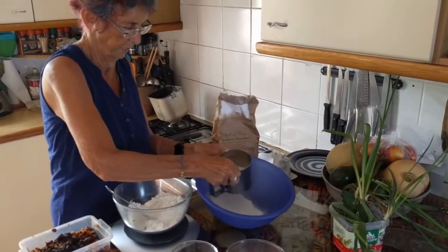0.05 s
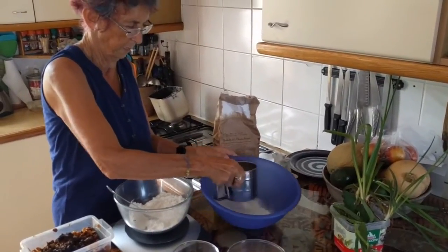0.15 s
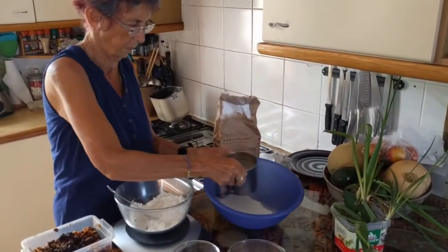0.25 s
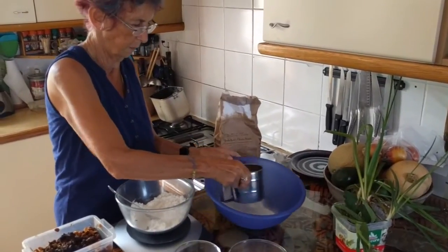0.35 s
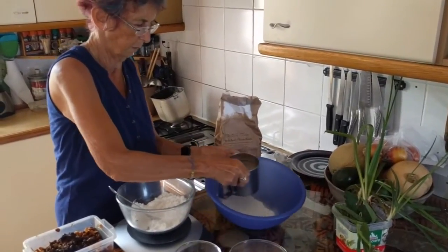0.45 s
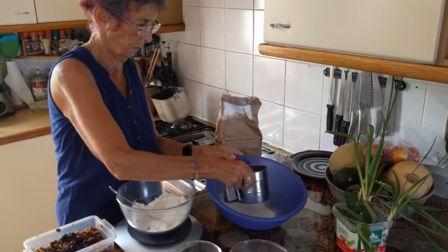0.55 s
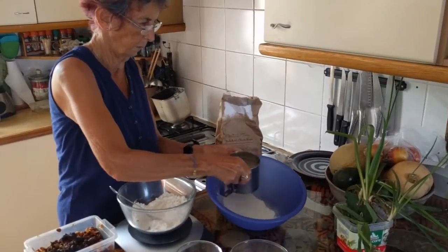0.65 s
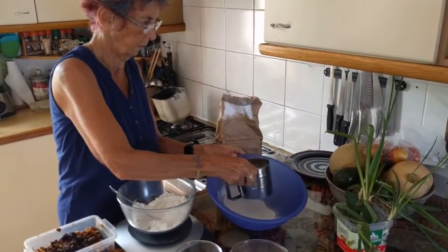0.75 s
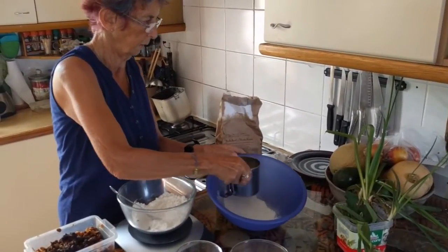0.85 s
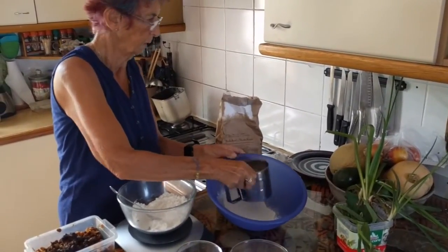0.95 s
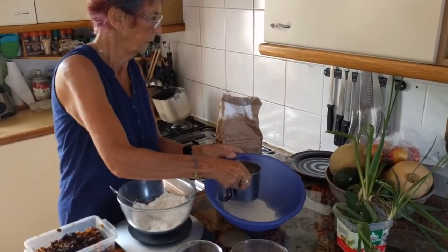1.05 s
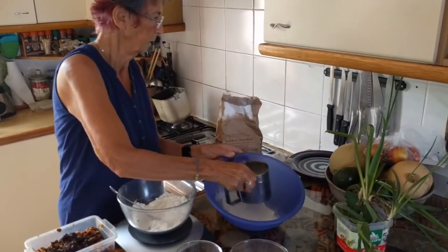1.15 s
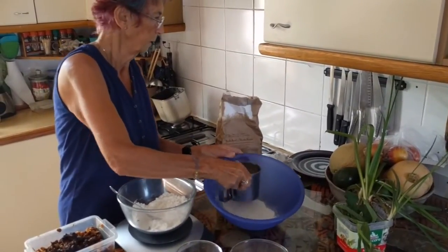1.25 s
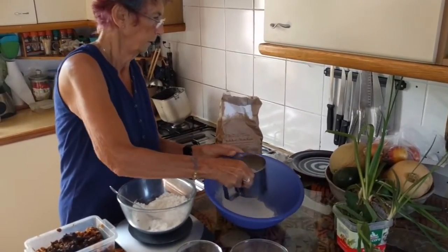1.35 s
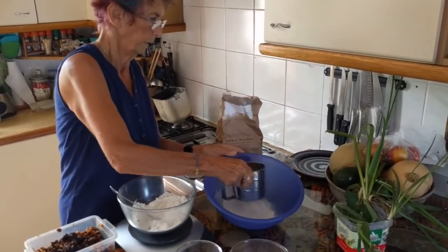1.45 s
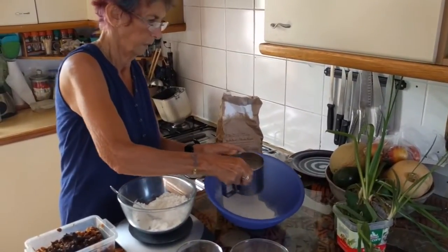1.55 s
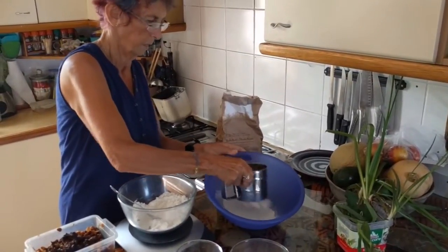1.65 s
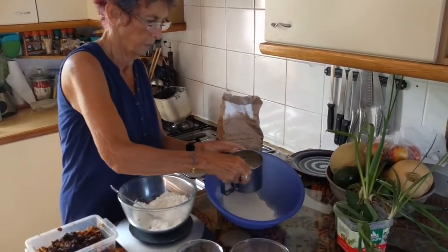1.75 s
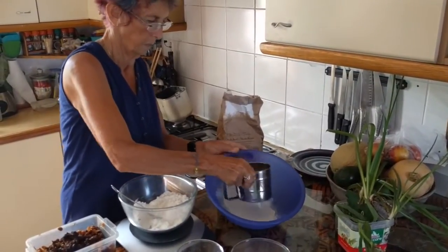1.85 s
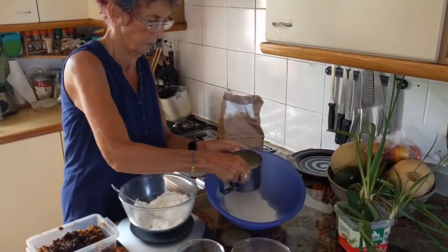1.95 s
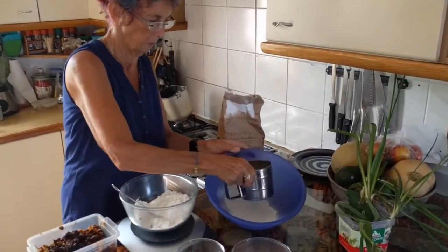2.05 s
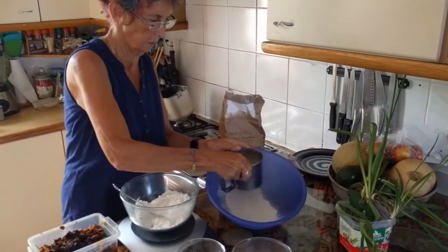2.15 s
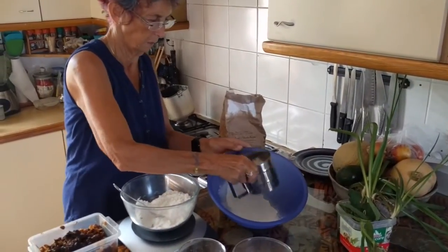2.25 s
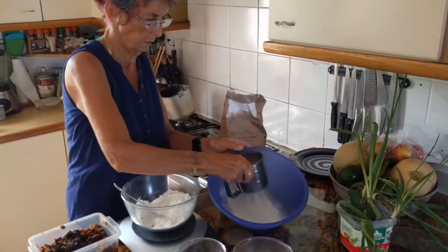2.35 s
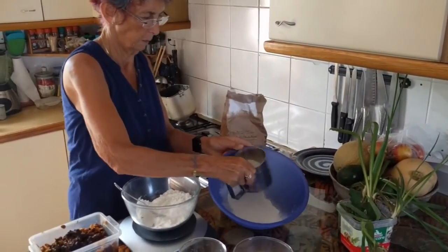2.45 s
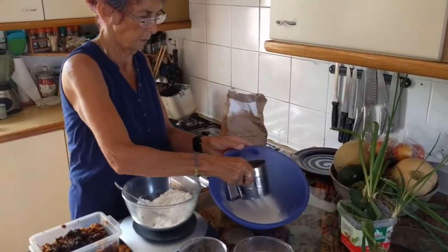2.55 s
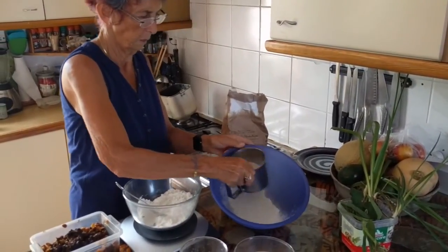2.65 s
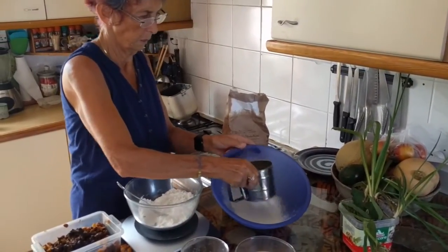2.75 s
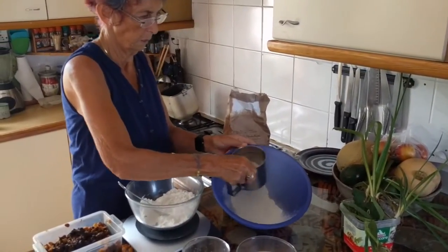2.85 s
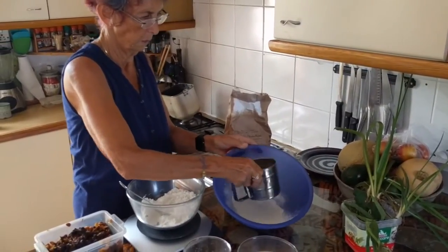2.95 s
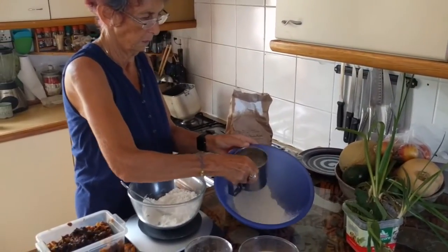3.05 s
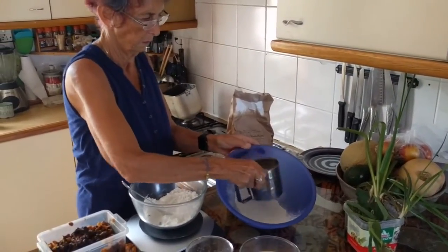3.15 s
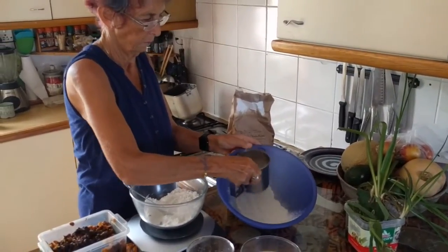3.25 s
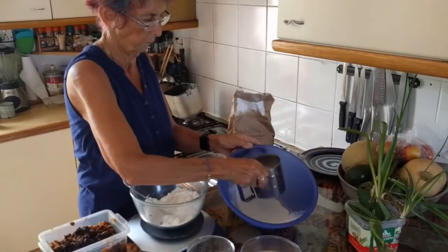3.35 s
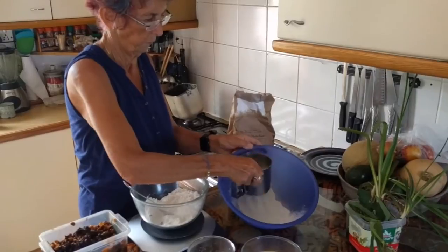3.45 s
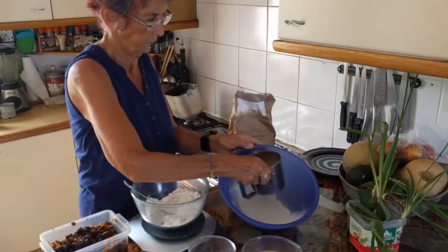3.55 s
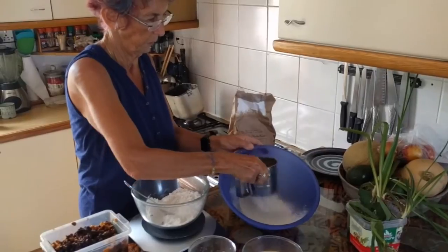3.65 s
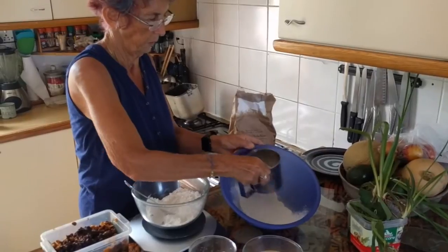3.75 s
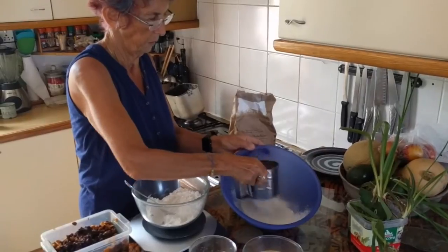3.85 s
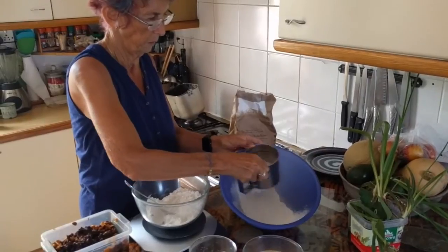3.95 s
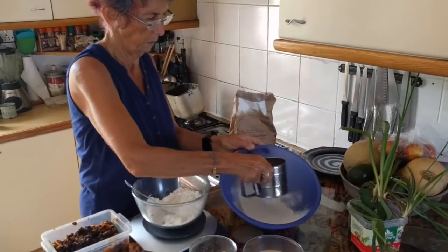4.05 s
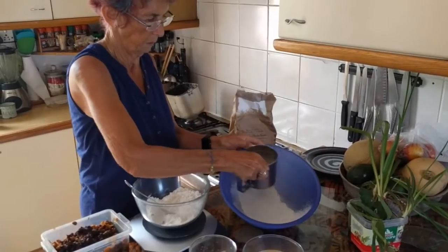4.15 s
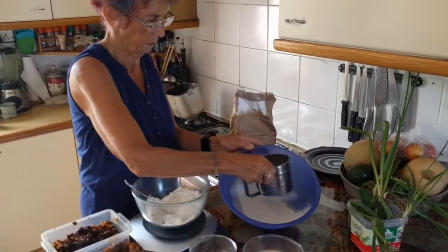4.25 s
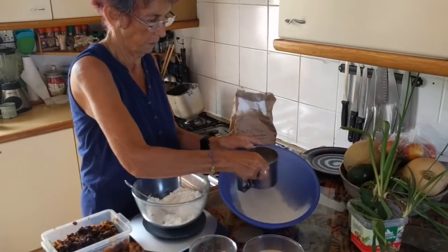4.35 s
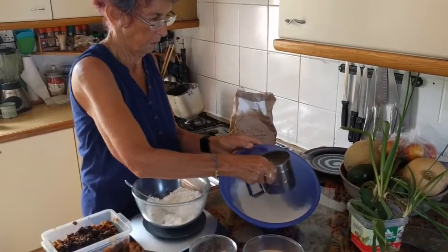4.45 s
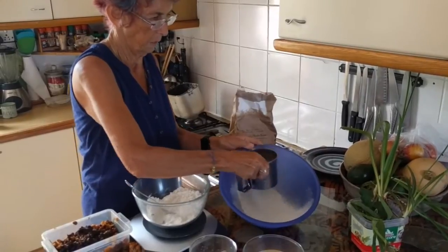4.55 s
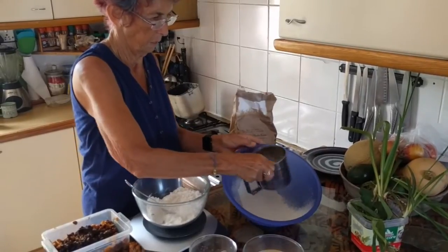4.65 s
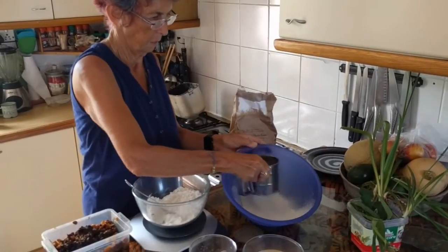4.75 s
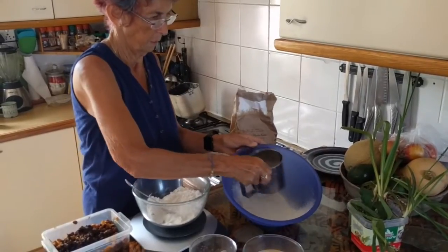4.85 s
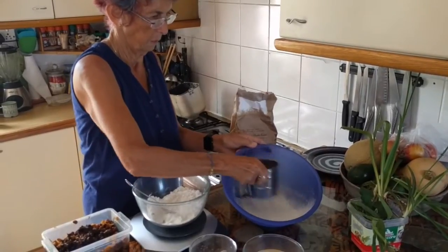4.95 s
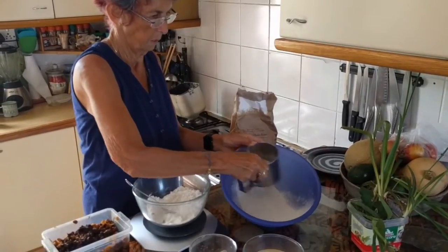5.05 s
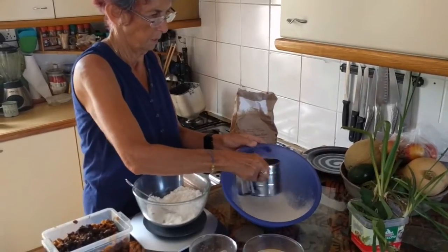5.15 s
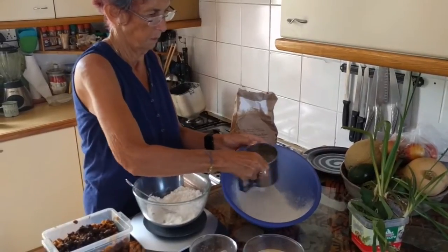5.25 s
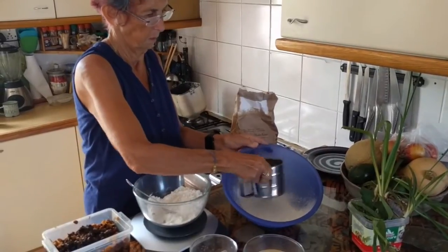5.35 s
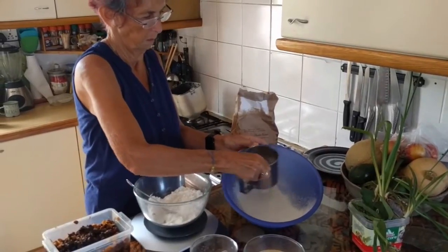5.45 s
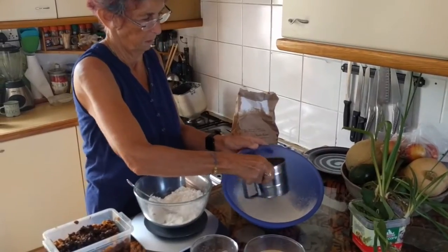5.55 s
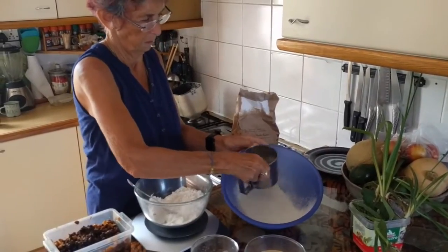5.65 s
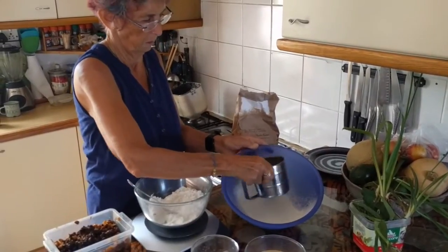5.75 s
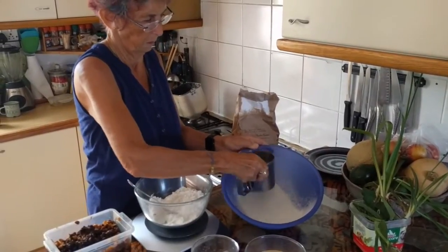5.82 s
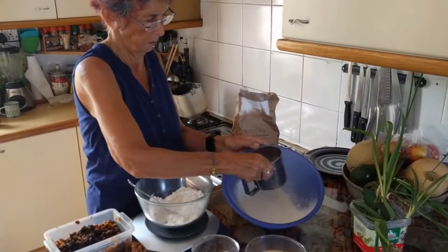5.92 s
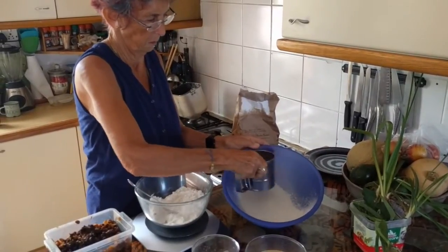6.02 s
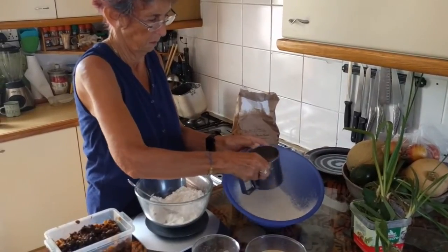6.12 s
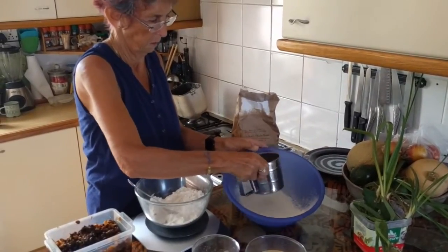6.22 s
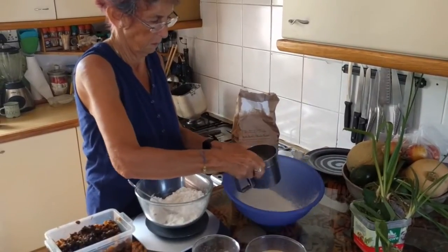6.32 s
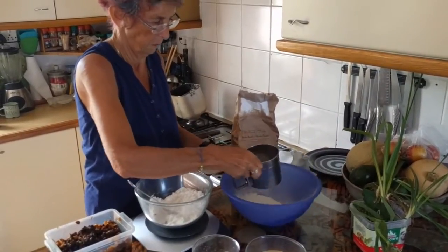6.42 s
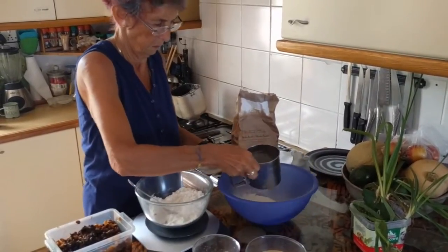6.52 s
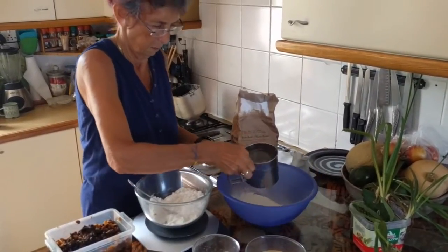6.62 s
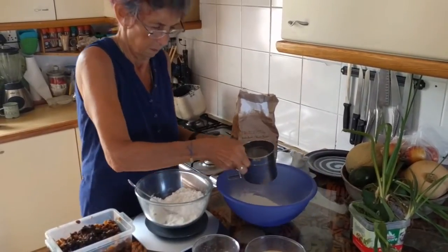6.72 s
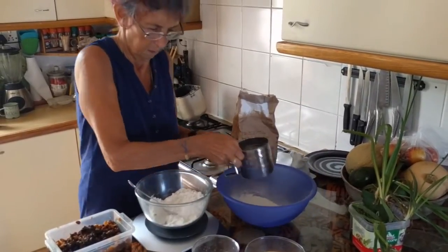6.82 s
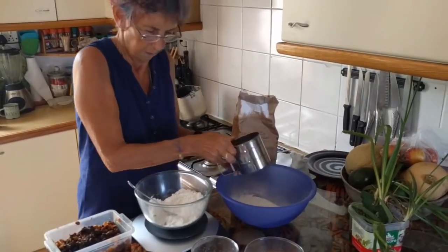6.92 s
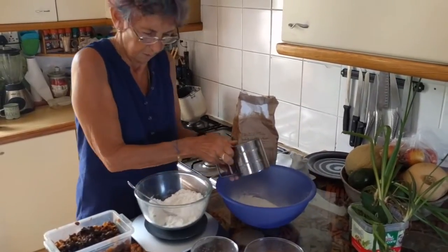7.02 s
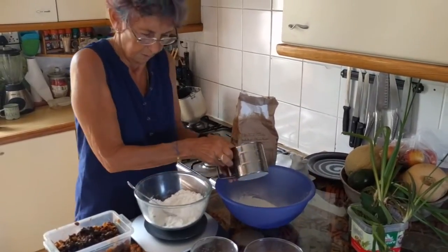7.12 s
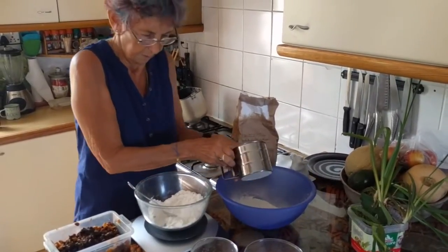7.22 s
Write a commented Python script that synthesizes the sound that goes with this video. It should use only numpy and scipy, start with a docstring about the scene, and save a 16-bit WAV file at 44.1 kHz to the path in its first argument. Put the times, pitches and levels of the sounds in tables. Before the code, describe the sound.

Quick, even knocks of a steel flour sifter against a plastic bowl, then a loud clank, a few bumps and faint clinks.

```python
"""Sifting flour into a bowl

A steel sifter knocks on the rim of a plastic bowl four or five times a second in a tiled kitchen.
Each impact excites damped modes: the bowl thuds, the flour-damped can clanks, its wire rattles, the
counter hums and the room reverberates. After a last hard blow the bowl rocks back onto the counter,
flour slides and the lifted sifter clinks twice. A low rumble and faint ticks lie underneath."""
import sys
import numpy as np
from scipy import signal
from scipy.fft import rfft, irfft, next_fast_len
from scipy.io import wavfile

SR = 44100
rng = np.random.default_rng(int(sys.argv[2]) if len(sys.argv) > 2 else 0)


def generate_wav(signal):
    """Clip the signal to [-1, 1] and save it as 16-bit WAV at the path in sys.argv[1]."""
    frames = np.transpose(np.atleast_2d(signal))
    scaled = np.clip(frames, -1, 1) * 32767
    pcm = np.round(scaled).astype(np.int16)
    wavfile.write(sys.argv[1], SR, pcm)


N = 321249
LEAD = SR // 10   # the knocking is already under way when the scene opens
TOTAL = N + LEAD


def from_db(db):
    """Amplitude ratio of a level in decibels."""
    return 10 ** (np.asarray(db) / 20)


def rms_one(x):
    """Normalisation to unit rms."""
    return x / np.sqrt(np.mean(x ** 2) + 1e-20)


def seconds(length):
    """Sample times over a duration."""
    return np.arange(int(length * SR)) / SR


def dying(t, t60):
    """Exponential decay of 60 dB in t60 seconds."""
    return np.exp(-np.log(1000) * t / t60)


def at_time(points, s):
    """Linear interpolation in time."""
    return np.interp(s, *np.transpose(points))


def at_hz(points, hz):
    """Interpolation on a log-frequency axis."""
    known_hz, values = np.transpose(points)
    return np.interp(np.log(np.maximum(hz, 1)), np.log(known_hz), values)


def noise(spectrum, size):
    """Spectral shaping of white noise, at unit rms."""
    n = next_fast_len(size)
    gain = from_db(at_hz(spectrum, np.fft.rfftfreq(n, 1 / SR)))
    return rms_one(irfft(rfft(rng.standard_normal(n)) * gain, n)[:size])


def cut(x, kind, hz, order=2):
    """Butterworth low- or high-pass filtering."""
    return signal.sosfilt(signal.butter(order, hz, kind, fs=SR, output="sos"), x)


def add(track, s, sound):
    """Superposition of a sound on the track at time s."""
    start = LEAD + round(s * SR)
    track[start:start + len(sound)] += sound[:TOTAL - start]


def attack_at(x, db):
    """Normalisation of a blow by the rms level of its first 12 ms."""
    head = x[:int(.012 * SR)]
    return from_db(db) * x / np.sqrt(np.mean(head ** 2) + 1e-20)


def ring(modes, t, spread_db, pitch=1):
    """Free vibration: damped modes start together, each with a randomly varied strength."""
    hz, db, t60 = np.transpose(modes)[:, :, None]
    strength = from_db(db + spread_db * rng.standard_normal(db.shape))
    return -np.sum(strength * dying(t, t60) * np.cos(2 * np.pi * pitch * hz * t), axis=0)


def struck(modes, spread_db, soft_hz, scrape, pitch=1):
    """Impact excitation: an impulse and a brief scrape drive the modes; a soft contact loses treble."""
    t, brief = seconds(.1), seconds(.008)
    contact = scrape * rng.standard_normal(len(brief)) * dying(brief, t60=0.045)
    contact[0] = 1
    sound = signal.fftconvolve(ring(modes, t, spread_db, pitch), contact)[:len(t)]
    return cut(sound, "low", hz=soft_hz)


def favour(modes, centre_hz, db_per_octave):
    """Selective excitation: the point of contact favours the modes near one frequency."""
    return [(hz, db - db_per_octave * abs(np.log2(hz / centre_hz)), t60) for hz, db, t60 in modes]


# spectrum of the background (frequency [Hz], relative level [dB])
RUMBLE_SPECTRUM = [(20, -10), (36, -24), (52, 5), (66, 3), (90, -4), (130, -9), (250, -16.5), (500, -24),
                   (1000, -23.5), (2500, -28), (6000, -36), (12000, -34.5), (16000, -35)]
def rumble(level_db=-48):
    """Stationary ambient noise, strongest in the low bass."""
    return from_db(level_db) * noise(RUMBLE_SPECTRUM, TOTAL)


def ticks(first_s=.149, period_s=.3072, hz=13500, level_db=-16, spread_db=3.5):
    """Electrical interference: tiny periodic clicks, untouched by the room."""
    out, t = np.zeros(TOTAL), seconds(.005)
    click = np.sin(2 * np.pi * hz * t) * dying(t, t60=0.00023)
    for s in np.arange(first_s, N / SR, period_s):
        add(out, s, from_db(level_db + spread_db * rng.standard_normal()) * click)
    return cut(out, "high", hz=8000, order=4)


# reverberation time of the kitchen (frequency [Hz], t60 [s])
REVERB_T60 = [(100, 0.33), (260, 0.55), (700, 0.43), (1800, 0.46), (4800, 0.5), (13000, 0.6)]
# spectrum of the reverberation (frequency [Hz], relative level [dB])
REVERB_SPECTRUM = [(60, 14), (130, 5), (230, 7), (400, 4), (750, 7.5), (1000, 3.5), (1700, 3), (3500, 2),
                   (7000, -1), (16000, -6)]
def reflections(t, wet_db=-37.5):
    """Diffuse field: dense echoes off tiles and cupboards decay at their own rate in each third-octave."""
    spectrum = rfft(rng.standard_normal(len(t)))
    hz = np.fft.rfftfreq(len(t), 1 / SR)
    edges = np.geomspace(50, 20000, 27)
    tail = np.zeros(len(t))
    for low, high in zip(edges, edges[1:]):
        centre = np.sqrt(low * high)
        decay = dying(t, at_hz(REVERB_T60, centre))
        band = irfft(spectrum * ((hz >= low) & (hz < high)), len(t)) * decay
        # each band holds the energy that its width and decay time give it
        share = np.sqrt(np.mean(decay ** 2) * 2 * (high - low) / SR)
        tail += from_db(at_hz(REVERB_SPECTRUM, centre) + wet_db) * share * rms_one(band)
    return tail


# standing waves of the kitchen (frequency [Hz], gain [dB], t60 [s])
ROOM_MODES = [(217, -74, 0.36), (477.5, -50.5, 0.44), (590, -48.5, 0.2), (774, -63, 0.92),
              (1644, -58.5, 0.36)]
def kitchen(radiated, build_s=0.014, gap_s=0.00025):
    """Room response: fixed standing waves, plus echoes whose shares by direction shift as the bowl turns."""
    t = seconds(.7)
    onset = 1 - np.exp(-np.maximum(t - gap_s, 0) / build_s)
    turn = np.linspace(0, 2 * np.pi, TOTAL)
    out = signal.fftconvolve(radiated[0], onset * ring(ROOM_MODES, t, spread_db=-2))
    for k, sound in enumerate(radiated):
        share = np.sqrt(2 / len(radiated)) * np.cos(turn + np.pi * k / len(radiated))
        out += signal.fftconvolve(share * sound, onset * reflections(t))
    return out[:TOTAL]


# modes of the counter (frequency [Hz], relative level [dB], t60 [s])
COUNTER_MODES = [(126.9, 11.5, 0.38), (151.7, 3, 0.35), (258.7, 2, 0.46), (572, 15.5, 0.093)]
def boom(swell_s, bend=0.226, sag_s=0.023):
    """Resonance of the counter: a low hum swells, and sags in pitch as the bowl's foot settles."""
    t = seconds(.45)
    bent_time = t + bend * sag_s * (1 - np.exp(-t / sag_s))
    hum = ring(COUNTER_MODES, bent_time, spread_db=2, pitch=1 + 0.017 * rng.standard_normal())
    return hum * (1 - np.exp(-t / swell_s))


# how firmly the bowl's foot rests on the counter (time [s], boom gain [dB])
FOOT_COUPLING = [(0, -38.5), (.84, -39.5), (1.1, -35.5), (1.7, -40.5), (2, -54), (2.6, -41), (3.9, -42),
                 (4.35, -46), (5, -40), (5.85, -50)]
def counter():
    """Structure-borne sound: blows pass through the bowl's foot; a drop builds up faster than a knock."""
    out = np.zeros(TOTAL)
    for s, *_ in RIM_KNOCKS:
        add(out, s, from_db(at_time(FOOT_COUPLING, s)) * boom(swell_s=0.027))
    for s, boom_db, *_ in BOWL_BUMPS:
        add(out, s, from_db(boom_db) * boom(swell_s=0.009))
    return out


# slides of flour (time [s], duration [s], level [dB])
FLOUR_SLIDES = [(6.45, 0.047, -46.5), (6.862, 0.071, -47.5), (7.085, 0.16, -56.5)]
# spectrum of sliding flour (frequency [Hz], relative level [dB])
FLOUR_SPECTRUM = [(2500, -13), (5000, 8), (8000, 4), (11000, 8), (16000, 2)]
def flour():
    """Friction noise: powder slides over steel in short, soft hisses."""
    out = np.zeros(TOTAL)
    for s, length, db in FLOUR_SLIDES:
        swell = np.sqrt(np.hanning(int(length * SR)))
        add(out, s, from_db(db) * swell * noise(FLOUR_SPECTRUM, SR)[:len(swell)])
    return out


# spectrum of the wire on the mesh (frequency [Hz], relative level [dB])
WIRE_SPECTRUM = [(2500, 3), (5000, 1), (7000, -1), (10000, -1.5), (16000, -9)]
def wire_rattle(db, after_db=-14):
    """Contact chatter: the stirring wire buzzes on the mesh, a sharp crack and a short after-rattle."""
    t = seconds(.1)
    settling = from_db(after_db) * np.linspace(1, 0, len(t))
    return attack_at(noise(WIRE_SPECTRUM, len(t)) * (dying(t, t60=0.05) + settling), db)


# modes of the hand-held bowl (frequency [Hz], relative level [dB], t60 [s])
BOWL_MODES = [(147.3, -14.5, 0.45), (232.2, 6.5, 0.066), (347, 7.5, 0.027), (390, -9, 0.02),
              (541, -2, 0.064), (668, -11, 0.071), (783, -11.5, 0.12)]
# where grip and tilt centre the bowl's response (time [s], frequency [Hz])
BOWL_CENTRE = [(0, 635), (.65, 596), (1.3, 402), (2.1, 373), (3.9, 355), (4.35, 530), (4.6, 463),
               (5.0, 364), (5.85, 400), (6.05, 544), (6.7, 570)]
def bowl_thud(s, db):
    """Damped shell vibration: the plastic wall thuds, slightly detuned by the grip at each blow."""
    grip = 1 + .012 * rng.standard_normal()
    modes = favour(BOWL_MODES, at_time(BOWL_CENTRE, s), db_per_octave=7.0)
    return attack_at(struck(modes, spread_db=2.5, soft_hz=1140, scrape=0.004, pitch=grip), db)


# modes of the can, struck at its usual spot (frequency [Hz], relative level [dB], t60 [s])
CAN_MODES = [(1250, -4.5, 0.0076), (1465, -6.5, 0.052), (1686, 2, 0.017), (1795, 1.5, 0.036),
             (2082, 0, 0.027), (2360, 3, 0.0084)]
# modes of the can's rolled edge (frequency [Hz], relative level [dB], t60 [s])
EDGE_MODES = [(2640, 6, 0.0056), (3140, 7.5, 0.0051), (3690, -0.5, 0.008), (4530, -1, 0.0024),
              (5210, -10.5, 0.0082)]
def can_clack(centre_hz, can_db, edge_db, usual_hz=1768):
    """Damped shell vibration: the floury steel can and its rolled edge ring briefly against the rim."""
    modes = favour(CAN_MODES, centre_hz, db_per_octave=10)
    can = struck(modes, spread_db=2.0, soft_hz=3120, scrape=0.07, pitch=(centre_hz / usual_hz) ** 0.94)
    edge = struck(EDGE_MODES, spread_db=2.0, soft_hz=6760, scrape=0.14)
    return attack_at(can, can_db) + attack_at(edge, edge_db)


# modes of the sifter's loose lever (frequency [Hz], relative level [dB], t60 [s])
LEVER_MODES = [(3580, -5, 0.0093), (3840, -3, 0.0099), (4920, -4.5, 0.015), (6600, -18.5, 0.0078),
               (9000, -6, 0.009)]
def lever_clank(can_db, mesh_db, mesh_hz, lever_db, wire_db):
    """Steel-on-steel impact: clear of the bowl, the can's main modes ring lower and the mesh drums."""
    can = struck(CAN_MODES[1:5], spread_db=5.0, soft_hz=2450, scrape=0.0025, pitch=0.903)
    mesh = struck([(mesh_hz, 0, .024)], spread_db=0, soft_hz=1490, scrape=0.0082)
    lever = struck(LEVER_MODES, spread_db=6.0, soft_hz=10100, scrape=0.29)
    return (attack_at(can, can_db) + attack_at(mesh, mesh_db)
            + attack_at(lever, lever_db) + wire_rattle(wire_db))


# how loudly the wire rattles with a knock, rising and falling (time [s], base level re force [dB])
WIRE_LEVEL = [(0, -11.5), (.85, -16), (1.3, -13), (1.7, -15), (2.3, -18), (2.9, -10.5), (3.7, -15.5),
              (4.75, -14.5), (5.2, -7.5), (5.85, -12)]
def knock(s, force_db, hardness_db, can_hz, usual_force_db=-21.5, leap_force_db=-16.5):
    """Impact of steel on plastic: a harder or stronger contact brings out the metal over the bowl."""
    can_db = force_db - 0.5 + 0.27 * hardness_db + 0.16 * (force_db - usual_force_db)
    edge_db = force_db - 7.5 + hardness_db
    leap_db = 3.2 * max(force_db - leap_force_db, 0)   # a strong blow throws the wire off the mesh
    wire_db = force_db + at_time(WIRE_LEVEL, s) + max(hardness_db, 0) + leap_db
    return bowl_thud(s, force_db) + can_clack(can_hz, can_db, edge_db) + wire_rattle(wire_db)


# knocks of the sifter on the rim (time [s], force [dB], contact hardness [dB], can centre [Hz])
RIM_KNOCKS = [(-0.02, -23.5, -20, 1776), (0.2068, -27, 6.5, 1970), (0.4088, -24, 0, 1940),
              (0.6278, -25.5, -7.5, 1790), (0.8388, -23, -0.5, 1774), (1.0527, -25, -26, 1684),
              (1.2657, -25.5, -29, 1650), (1.4974, -22, 2, 1694), (1.7114, -23.5, 2, 1720),
              (1.9367, -24.5, -0.5, 1674), (2.1505, -22.5, 1, 1710), (2.3833, -24, -3, 1770),
              (2.5982, -24, -17, 1660), (2.8212, -23, 6.5, 1777), (3.0396, -23.5, -1, 1794),
              (3.245, -22.5, -2.5, 1780), (3.4703, -23.5, 0.5, 1780), (3.6887, -22, -3, 1770),
              (3.89, -21, 2, 1790), (4.1393, -26, 7.5, 1700), (4.338, -13.5, -0.5, 1713),
              (4.5608, -16.5, -1.5, 1710), (4.7935, -24.5, -2.5, 1890), (4.9867, -23.5, -5, 1796),
              (5.204, -23, -1, 1876), (5.4129, -25, 5.5, 1880), (5.6264, -22.5, 4, 1807),
              (5.8348, -24, 6.5, 1850)]
# blows of the lever on the can (time [s], can [dB], mesh [dB], mesh pitch [Hz], lever [dB], wire [dB])
LEVER_CLANKS = [(6.015, -14.5, -26.5, 976, -21.5, -21), (7.041, -40, -42, 760, -66, -47.5),
                (7.077, -35.5, -34, 1180, -55, -48)]
# the bowl drops back and rocks (time [s], boom gain [dB], bowl wall [dB], rim clack [dB])
BOWL_BUMPS = [(6.051, -32.5, -25, -50), (6.429, -46.5, -44.5, -46.5), (6.588, -36.5, -27.5, -33),
              (6.66, -50, -35, -60), (6.716, -40.5, -36, -48), (7.075, -54, -45, -53),
              (7.244, -50.5, -49, -62)]
def sifter_and_bowl(clack_hz=1797):
    """Radiation of all the blows in one direction; the fine detail differs in every direction."""
    out = np.zeros(TOTAL)
    for s, *blow in RIM_KNOCKS:
        add(out, s, knock(s, *blow))
    for s, *blow in LEVER_CLANKS:
        add(out, s, lever_clank(*blow))
    for s, _, wall_db, clack_db in BOWL_BUMPS:
        add(out, s, bowl_thud(s, wall_db) + can_clack(clack_hz, clack_db, edge_db=clack_db - 7.5))
    return out


def scene(directions=4):
    """Superposition at one point of direct sound, reverberation, the counter's hum and the background."""
    radiated = [sifter_and_bowl() + flour() for _ in range(directions)]
    background = rumble()
    return (radiated[0] + kitchen(radiated) + counter() + ticks() + background)[None, LEAD:]


def gain_control(x, threshold_db=-5.0, attack_s=0.012, release_db_per_s=18):
    """Compression: a loud peak lowers the gain, too late for the peak itself; the gain then creeps back."""
    over_db = np.maximum(20 * np.log10(abs(x) + 1e-9) - threshold_db, 0)
    ramp = release_db_per_s * np.arange(N) / SR
    held_db = np.maximum.accumulate(over_db + ramp, axis=-1) - ramp
    pole = np.exp(-1 / (attack_s * SR))
    return x * from_db(-signal.lfilter([1 - pole], [1, -pole], held_db))


def record(dry):
    """Band limiting and saturation: the hardest blows duck the gain and clip softly."""
    ceiling, cutoff_hz = .72, 16400
    ducked = gain_control(cut(dry, "high", hz=34.5))
    clipped = ducked / (1 + (ducked / ceiling) ** 6) ** (1 / 6)
    return signal.sosfiltfilt(signal.butter(20, cutoff_hz, fs=SR, output="sos"), clipped)


dry = scene()
out = record(dry)
generate_wav(out)
```